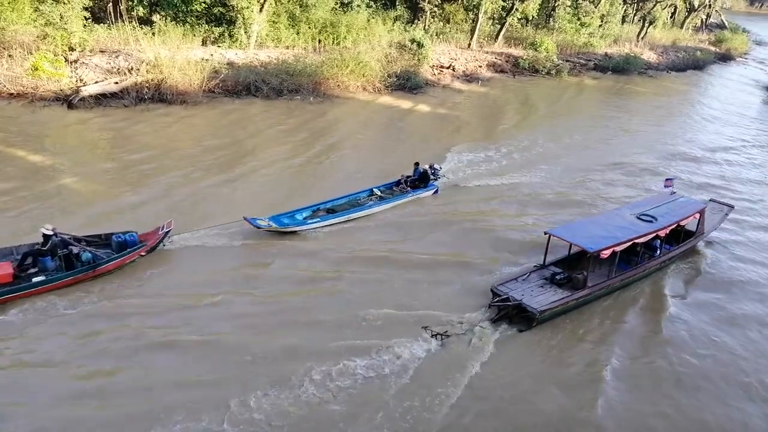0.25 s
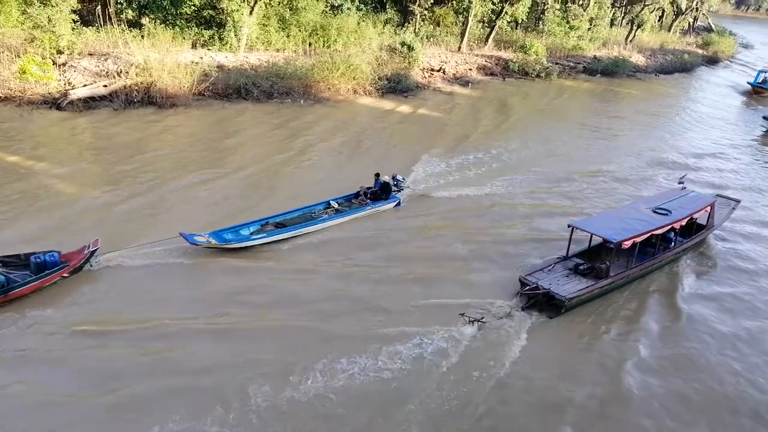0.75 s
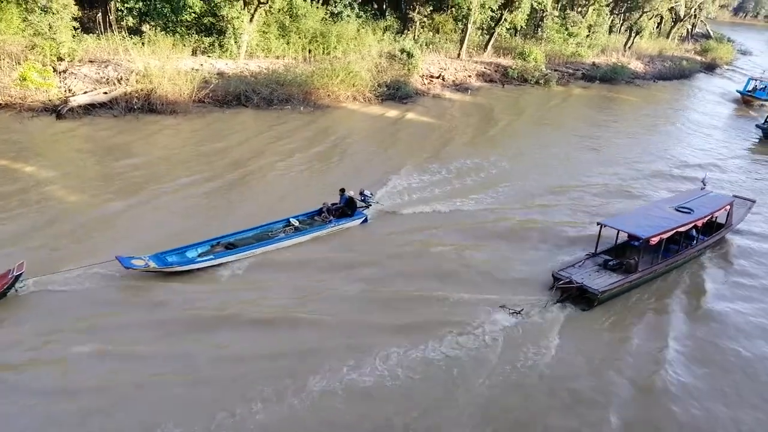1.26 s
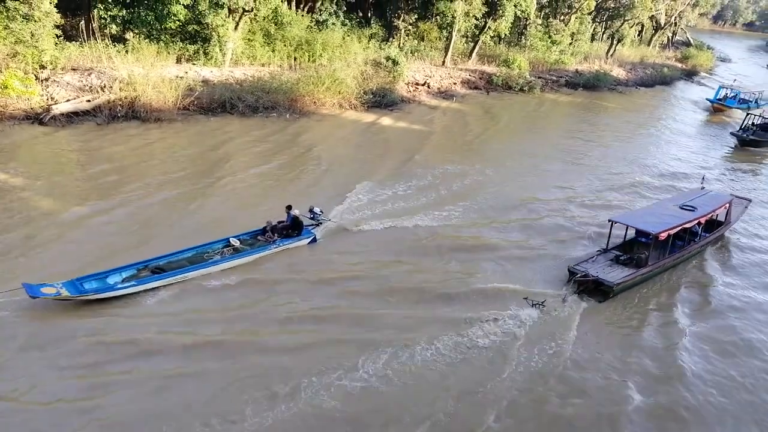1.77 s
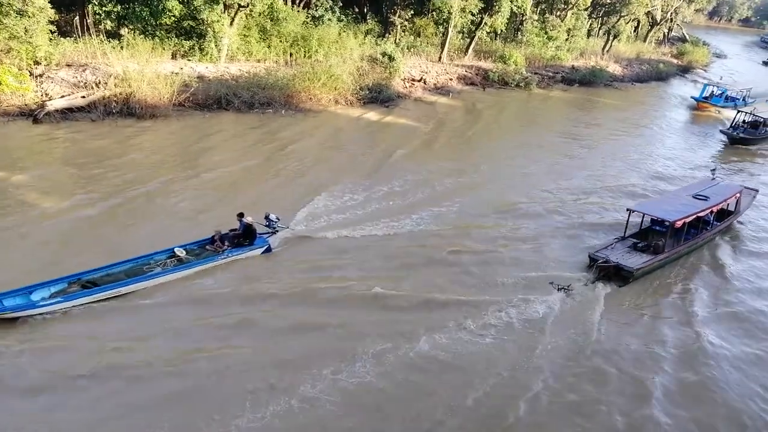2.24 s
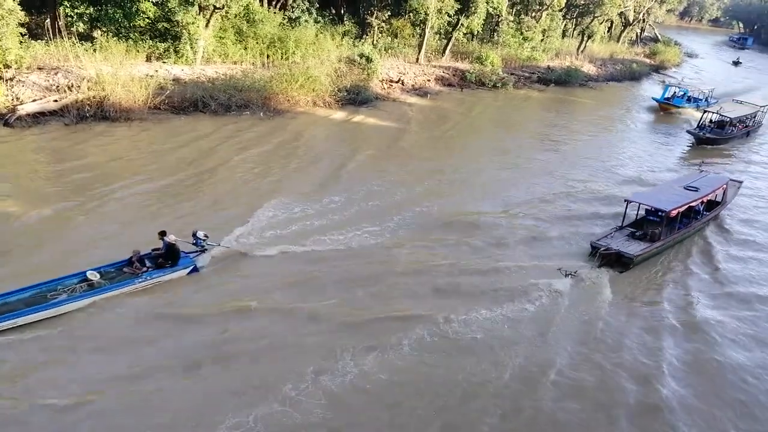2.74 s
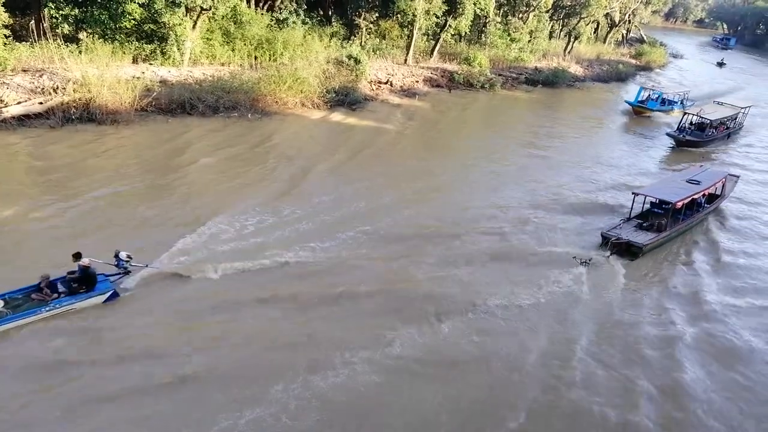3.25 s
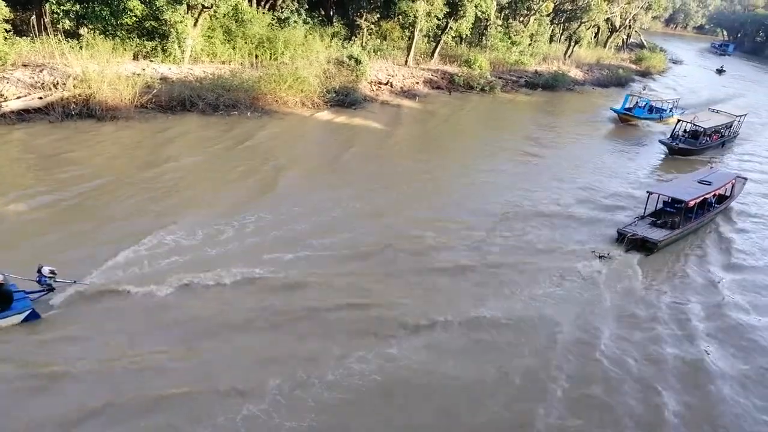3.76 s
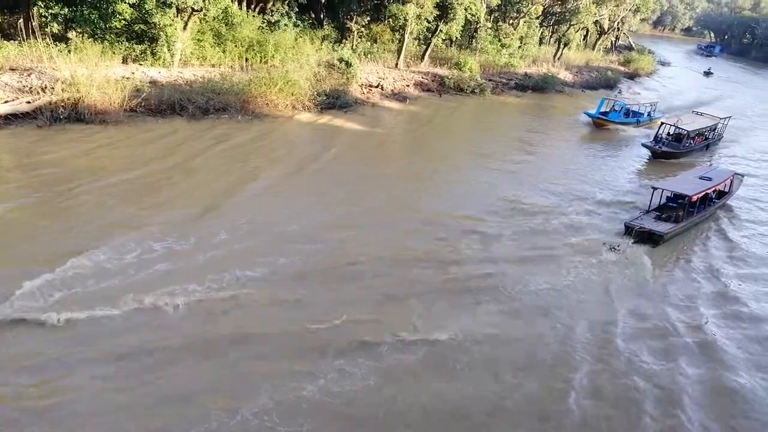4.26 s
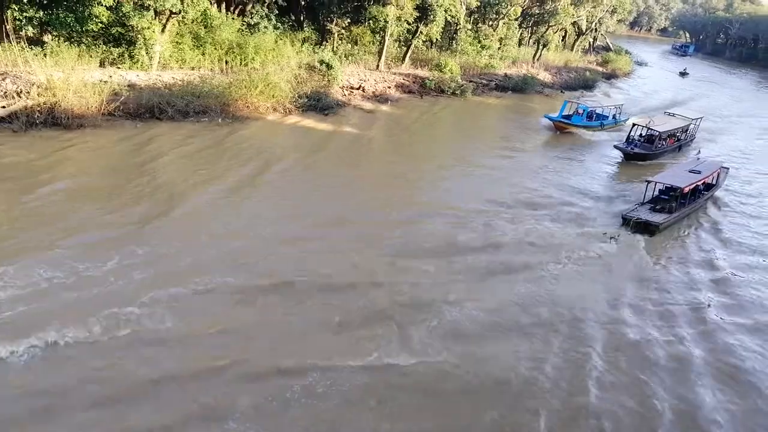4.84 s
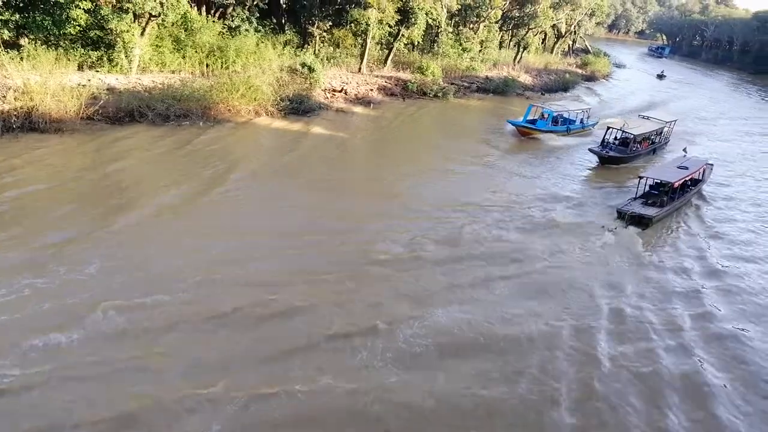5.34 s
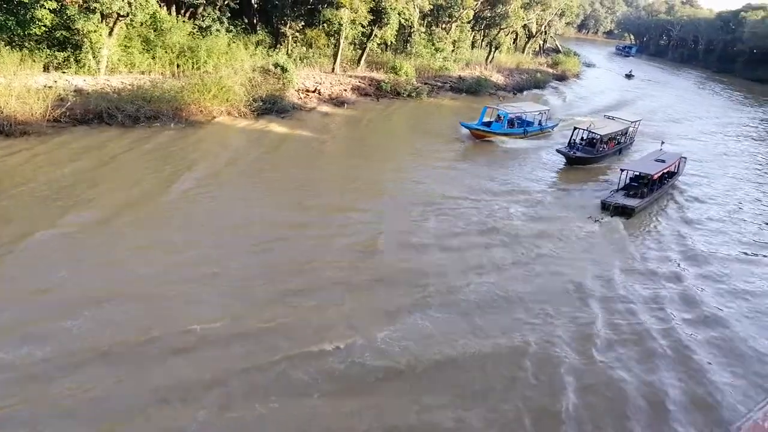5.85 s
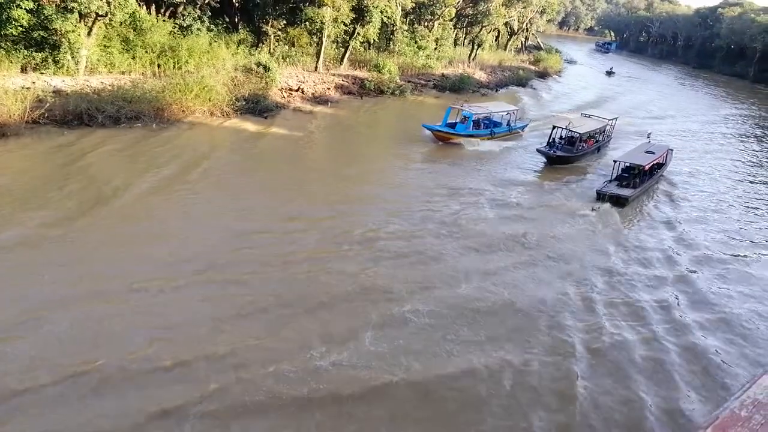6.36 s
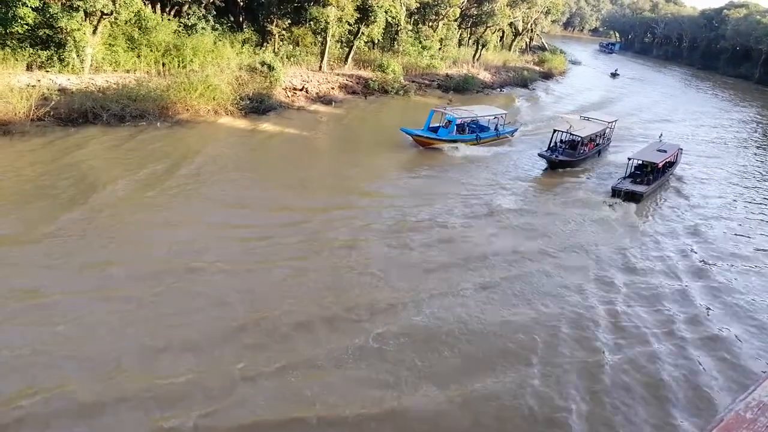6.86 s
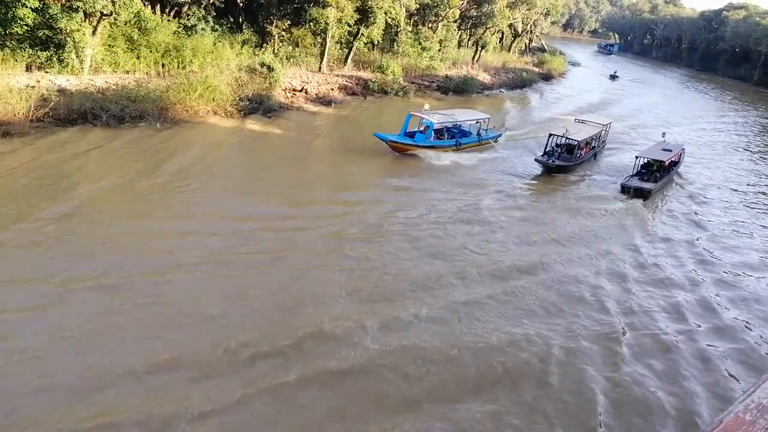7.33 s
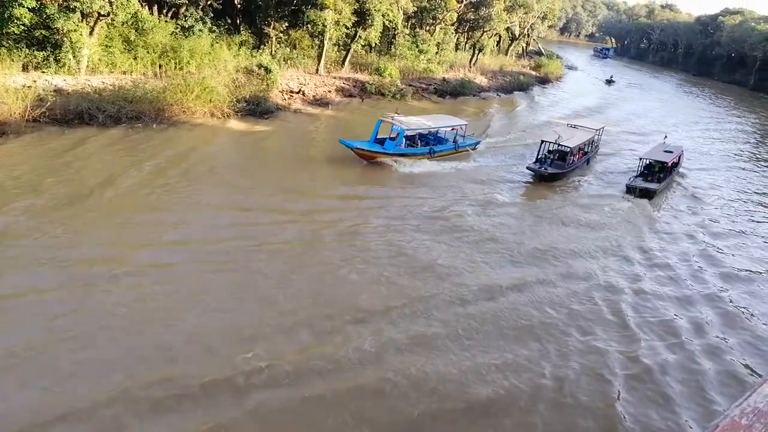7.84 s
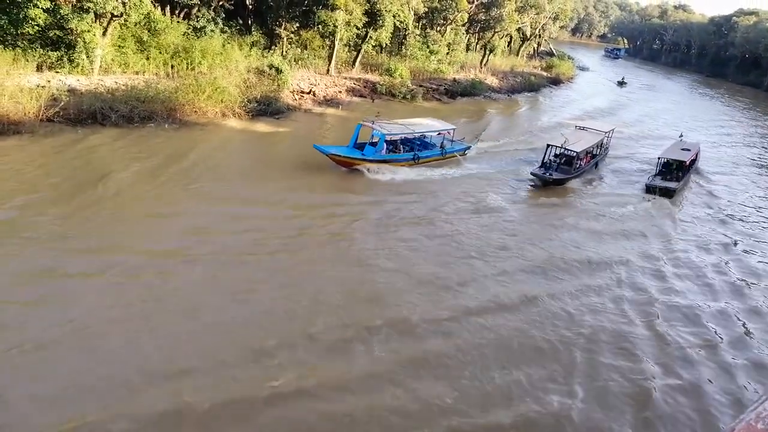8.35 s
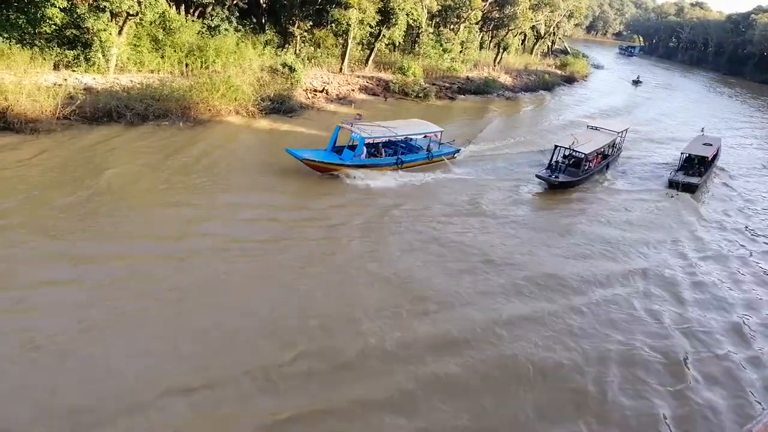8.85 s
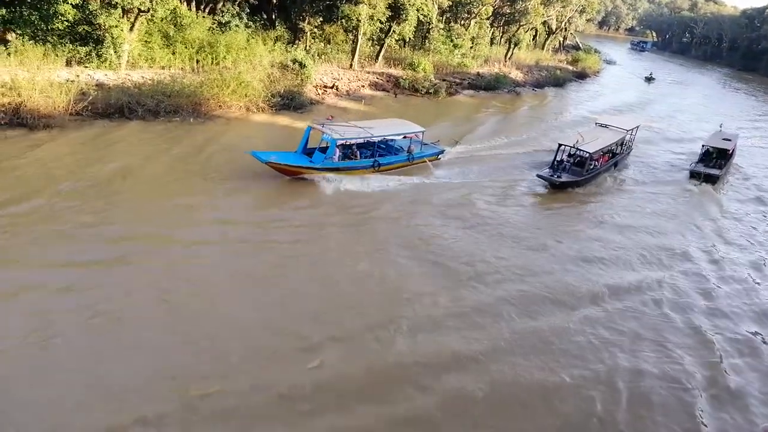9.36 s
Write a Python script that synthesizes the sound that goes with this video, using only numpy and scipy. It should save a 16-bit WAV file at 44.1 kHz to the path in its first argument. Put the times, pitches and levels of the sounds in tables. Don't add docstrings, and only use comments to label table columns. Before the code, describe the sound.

On an open river, a fast single-cylinder outboard putters sharply while a slower engine barks, hisses and thumps about ten times a second. A deep inboard drone and rushing wakes lie beneath. The fast engine fades out after six seconds; the slow one slackens, then pulls again near the end. Handheld stereo microphone above the water.

```python
import sys
import numpy as np
from scipy import signal
from scipy.fft import rfft, irfft
from scipy.io import wavfile
from scipy.ndimage import uniform_filter1d

SR = 44100
rng = np.random.default_rng(int(sys.argv[2]) if len(sys.argv) > 2 else 0)


def ratio(d):
    e = np.asarray(d, float) / 20
    return 10 ** e


def waveform_to_disk(signal):
    frames = np.transpose(np.atleast_2d(signal))
    scaled = np.clip(frames, -1, 1) * 32767
    samples = np.round(scaled).astype(np.int16)
    wavfile.write(sys.argv[1], SR, samples)


N = 423360
TIME = np.arange(N) / SR


def evened(x):
    return x / np.sqrt(np.mean(x ** 2) + 1e-20)


def curve(rows, column):
    return np.interp(TIME, [r[0] for r in rows], [r[column] for r in rows])


def colour(x, points):
    f, db = np.transpose(points)
    hz = np.fft.rfftfreq(N, 1 / SR)
    gain_db = np.interp(np.log(hz + 1), np.log(f), db)
    return irfft(rfft(x) * ratio(gain_db), N)


def noise(points):
    return evened(colour(rng.standard_normal(N), points + [(SR / 2, -90)]))


def wander(top_hz):
    t = TIME[::64]
    rates_hz = np.geomspace(top_hz / 12, top_hz, num=20)
    drift = sum(np.sin(2 * np.pi * (f * t + rng.random())) / np.sqrt(f) for f in rates_hz)
    return evened(drift).repeat(64)[:N]


def clicks(s, db):
    train = np.zeros(N)
    train[np.clip(np.round(s * SR).astype(int), 0, N - 1)] = ratio(db)
    return train


def gusts(train, t60_s, echo_db):
    rise_s, echo_s = 0.0013, 0.0095
    ragged_db, ragged_s = 1.9, 0.0012
    t = TIME[:SR // 5]
    shape = (1 - np.exp(-t / rise_s)) ** 2 * ratio(-60 * t / t60_s)
    shape = shape + ratio(echo_db) * np.interp(t - echo_s, t, shape, left=0)
    size = round(ragged_s * SR)
    tear = uniform_filter1d(uniform_filter1d(rng.standard_normal(N), size=size), size=size)
    return signal.oaconvolve(train, shape / shape.max())[:N] * ratio(ragged_db * evened(tear))


def thumps(train, modes, lead_s):
    t = TIME[:SR // 3]
    ring = sum(ratio(db - 60 * t / t60_s) * np.sin(2 * np.pi * hz * t) for hz, db, t60_s in modes)
    return signal.oaconvolve(train, ring)[round(lead_s * SR):][:N]


def resonate(x, hz, width_hz):
    turn = np.exp(2j * np.pi * np.cumsum(hz) / SR)
    r = np.exp(-np.pi * width_hz / SR)
    return 2 * (turn * signal.lfilter([(1 - r) ** 2], [1, -2 * r, r * r], x / turn)).real


def held(s, values):
    return values[np.clip(np.searchsorted(s, TIME) - 1, 0, None)]


def rung(envelope, drive, hz, width_hz):
    front = np.maximum(np.diff(envelope, n=2, prepend=envelope[[0, 0]]), 0)
    crack = signal.lfilter([1, -1], [1], front)
    ring = evened(resonate(envelope * drive, hz, width_hz))
    ring = ring + 0.8 * evened(resonate(crack, hz, 0.7 * width_hz))
    return evened(ring) * np.sqrt(np.mean(envelope ** 2))


START_TURNS = (-.785, -.518, -.70)


def crank(speed, engine):
    done = START_TURNS[engine] + np.cumsum(curve(speed, 1)) / SR
    return done, np.interp(np.arange(int(done[-1]) + 1), done, TIME)


def ports(x, loose_hz):
    lag_samples = 17
    hz = np.fft.rfftfreq(N, 1 / SR)
    share = 1 / (1 + (loose_hz / (hz + 1)) ** 3.1)
    right = irfft(np.sqrt(1 - share) * rfft(x[0]) + np.sqrt(share) * rfft(x[1]), N)
    return np.array([np.roll(x[0], lag_samples), right])


def banks(x):
    t = TIME[:SR // 2]
    tail = rng.standard_normal((2, len(t))) * ratio(-60 * t / 2.3) * (t > 0.015)
    return signal.fftconvolve(x, tail / np.linalg.norm(tail[0]), axes=1)[:, :N]


# (time [s], level [dB])
WAKE_SURGE = [(0.16, 3), (1.07, 1.8), (1.9, 0), (2.14, 2), (2.48, -5.5), (2.73, -1), (3.05, -3.5),
              (3.4, 1.5), (3.79, 2.5), (4.39, 3.5), (4.78, -1), (5.18, 5.5), (5.48, 1.5), (5.86, 2),
              (6.17, 0.5), (6.76, 2), (7.9, 2), (8.66, -5)]
# (frequency [Hz], level [dB])
RUMBLE_SPECTRUM = [(12, -45), (20, -18), (60, -2.5), (81, 0.5), (109, 0.5), (151, 0), (231, -9),
                   (267, -13.5), (303, -12), (464, -29.5), (600, -74), (780, -86), (1320, -120)]
ROAR_SPECTRUM = [(300, -2.5), (500, -6), (700, -12), (950, -0.5), (1400, -2), (2000, -3), (2500, 5),
                 (3100, -6.5), (4000, -7), (5000, -6.5), (6500, -18)]
FIZZ_SPECTRUM = [(3500, -24), (5000, -18.5), (7000, 0.5), (8500, -10), (10500, -20.5), (15000, -33.5)]


def wash():
    rumble_db, roar_db, fizz_db = -28, -27, -39.5
    lull_db, lull_at_s, lull_s = -5.5, 3.6, 0.78
    apart = np.array([noise(RUMBLE_SPECTRUM), noise(RUMBLE_SPECTRUM)])
    rumble = noise(RUMBLE_SPECTRUM) + ratio(-15.5) * apart
    swell_db = 0.64 * wander(25)
    surge_db = curve(WAKE_SURGE, 1)
    lull = lull_db * np.exp(-((TIME - lull_at_s) / lull_s) ** 2)
    roar_gain = ratio(roar_db + 0.15 * surge_db + swell_db)
    fizz_gain = ratio(fizz_db + lull + swell_db)
    air = [roar_gain * noise(ROAR_SPECTRUM) + fizz_gain * noise(FIZZ_SPECTRUM) for _ in "lr"]
    return ports(air, 670), rumble * ratio(rumble_db + surge_db)


# (time [s], 1st order [dB], 2nd order over 1st [dB])
INBOARD_LEVELS = [(0, -34, 0), (.3, -35, 9.5), (.8, -24.5, -15.5), (1.1, -34, -12), (1.5, -30.5, 2),
                  (2.4, -25.5, -26), (3.6, -30.5, -32), (4, -29, -17), (4.5, -23.5, -12), (5.1, -29.5, 2),
                  (5.5, -30, -6.5), (5.85, -19.5, -12), (6.25, -26, -8.5), (6.9, -28, 5), (7.25, -27, -6.5),
                  (7.5, -25.5, -2), (8.4, -23, 1), (9.2, -28.5, 2.5)]
# (multiple of firing [1], level [dB])
INBOARD_MINOR = [(.5, -45), (1.5, -37), (2.5, -41), (3.5, -48), (4, -47), (4.5, -51), (5, -52), (8.25, -57),
                 (12, -50), (13, -52), (14, -53), (16, -52)]
# (time [s], firing rate [1/s])
INBOARD_RATE = [(0.0, 74.564), (1.55, 74.623), (1.7, 74.882), (3.3, 75.164), (5.95, 75.276), (8.25, 73.879),
                (8.4, 73.197), (9.6, 71.43)]


def inboard():
    hull_hz, hull_width_hz, hull_db = 896, 190, -11
    nearing_db_per_s = 1.18
    turns = 2 * np.pi * crank(INBOARD_RATE, 2)[0]
    first, rasp = curve(INBOARD_LEVELS, 1), curve(INBOARD_LEVELS, 2)
    third = -44 + 0.39 * (first - first.mean()) + 0.033 * rasp + nearing_db_per_s * TIME
    main = sum(ratio(db + 1.8 * wander(6)) * np.cos(k * turns)
               for k, db in enumerate((first, first + rasp, third), 1))
    minor = sum(ratio(db + 1.17 * wander(4)) * np.cos(k * turns + (0.25 + 0.08 * k) * wander(8))
                for k, db in INBOARD_MINOR)
    hum = resonate(rng.standard_normal(N), np.full(N, hull_hz), hull_width_hz)
    hull = ratio(third + hull_db) * evened(hum)
    return hull - np.sqrt(2) * (main + minor * ratio(third + 34))


# (time [s], left puff [dB], right puff [dB], left crest [Hz], right crest [Hz])
FAST_PATH = [(0, -28.5, -26, 1180, 1150), (.5, -16.5, -21.5, 1360, 1170), (1, -16, -15.5, 1450, 2930),
             (1.7, -14.5, -15, 1810, 2640), (2.25, -14, -20, 2190, 2230), (3, -16, -25.5, 2300, 1690),
             (3.8, -13.5, -22.5, 2400, 1710), (4.6, -15.5, -20, 2460, 1620),
             (5.4, -13.5, -20.5, 2420, 1640), (6, -20.5, -18, 2210, 1600), (6.35, -33, -29.5, 2470, 1760),
             (6.9, -46, -37, 2400, 1750)]
# (time [s], firing rate [1/s])
FAST_RATE = [(0.0, 13.855), (1.3, 15.209), (1.5, 15.042), (1.85, 15.423), (3.75, 15.533), (3.9, 15.204),
             (4.4, 15.485), (6.35, 15.382), (6.9, 14.843)]
# (order [1], pipe turned away [dB], pipe turned our way [dB])
FAST_THUMP = [(1, -57, -58), (2, -33.5, -36), (3, -82, -44), (4, -55, -36), (5, -27.5, -40), (6, -27, -26),
              (7, -36.5, -27.5), (8, -67, -35), (9, -35.5, -58), (10, -35, -49), (11, -55, -37),
              (12, -41.5, -52), (14, -46, -47)]
# (frequency [Hz], level [dB])
PUFF_SPECTRUM = [(300, -9.5), (500, -14), (1000, -7), (1500, -5), (2000, -6.5), (2500, 0.5), (3100, -3),
                 (4000, -4.5), (5500, -17), (7000, -11.5), (8500, -17), (10500, -27), (15800, -41)]


def fast_engine():
    done, s = crank(FAST_RATE, 1)
    s = s[s < FAST_PATH[-1][0]]
    luck = rng.standard_normal((len(s), 3))
    left_hz, right_hz = curve(FAST_PATH, 3), curve(FAST_PATH, 4)
    turn_from_s, turn_s = 3.45, 2.1
    facing = np.clip((TIME - turn_from_s) / turn_s, 0, 1)

    puffs = gusts(clicks(s, 1.83 * luck[:, 0]), 0.034, -20)
    puffs = puffs + 0.14 + 0.22 * np.exp(-TIME / 0.49)
    late_s = TIME - 0.91 / left_hz
    air = [puffs * noise(PUFF_SPECTRUM) for _ in "lr"]
    air = ports([x + 0.34 * np.interp(late_s, TIME, x) for x in air], 2100)

    white = rng.standard_normal(N)
    drift = 1 + 0.053 * held(s, luck[:, 2])
    crests = [rung(puffs, white, hz * drift, 380) for hz in (left_hz, right_hz)]
    crests[0] = crests[0] + 0.2 * rung(puffs, white, 2 * left_hz * drift, 610) * (1 - facing)
    port_db = np.array([curve(FAST_PATH, 1) - 2.5, curve(FAST_PATH, 2) - 2.6])
    air = (air + ratio(1.0) * np.array(crests)) * ratio(port_db)

    ring_peak_s, ring_s = 4.2, 1.7
    ring_db = -27 + 9 * np.exp(-((TIME - ring_peak_s) / ring_s) ** 2)
    strikes = clicks(s + 0.0004 * luck[:, 2], 1.2 * luck[:, 1])
    ring = thumps(strikes, [(765, 0, 0.075), (690, -5, 0.06)], 0.014) * ratio(ring_db)
    knock = thumps(clicks(s, luck[:, 0]), [(489, -30.5, 0.043)], 0) * (1 - facing)

    turns = 2 * np.pi * (done - 0.018)
    close_db, close_s, gone_s, gone_db_per_s = 4.5, 0.24, 6.35, 51
    thump_db = -4 + close_db * np.exp(-TIME / close_s) - gone_db_per_s * np.maximum(TIME - gone_s, 0)
    thump = sum(ratio(away + facing * (near - away) + 1.3 * wander(4)) * np.cos(k * turns)
                for k, away, near in FAST_THUMP)
    return air + knock + ring * np.array([[-0.5], [1]]), -np.sqrt(2) * thump * ratio(thump_db)


# (time [s], firing rate [1/s])
SLOW_RATE = [(0.0, 10.096), (5.55, 9.89), (6.1, 9.482), (6.3, 8.596), (6.6, 8.692), (6.75, 8.421),
             (8.05, 7.811), (8.35, 7.824), (8.6, 8.369), (8.75, 8.795), (9.2, 9.411), (9.6, 9.243)]
# (time [s], hiss [dB], bark over hiss [dB])
SLOW_THROTTLE = [(0, -36, 11.5), (1.3, -33.5, 11.5), (1.6, -36, 1.5), (2.2, -35, 13.5), (4.1, -38, 12.5),
                 (4.4, -27.5, 5.5), (4.98, -37.5, 13.5), (5.07, -23.5, -1), (5.7, -27, -1), (5.79, -34, -1),
                 (6.3, -34, 1), (8.03, -43, 6), (8.14, -32.5, -5), (8.42, -31.5, 11.5), (8.55, -21, -0.5),
                 (8.88, -19.5, -1), (8.98, -34, 6), (9.6, -29.5, 7.5)]
# (time [s], extra hiss [dB], extra bark [dB], bright spot [Hz])
HARD_FIRINGS = [(0.077, 5, 6, 2530), (.376, 4, 3.5, 2820), (.475, 8, 6.5, 1940), (.574, 2.5, 1.5, 3320),
                (0.87, 6, 2.5, 2760), (0.975, 7.5, 3, 2720), (1.17, -4.5, 2, 3010), (1.268, 5, 5.5, 3000),
                (1.368, 9, 5.5, 2380), (1.467, 4.5, 4.5, 2720), (1.566, 9.5, 8.5, 2590),
                (1.767, 4, 8.5, 2750), (2.365, 3.5, 2, 2700), (2.465, 9, 4.5, 2290), (2.865, 8, 3.5, 3250),
                (3.167, 4.5, 3, 2490), (3.266, 9.5, 5.5, 3080), (3.569, 7, 2.5, 2420),
                (3.667, 6.5, .6, 2420), (3.869, 8, 3.5, 2570), (3.969, 5.5, 4.5, 2270),
                (4.27, 5.5, 0, 2450), (4.572, 5.5, 4, 2420), (4.773, 7.5, 3.5, 2580), (6.669, 6.5, 8, 2560),
                (7.028, 6, 7, 2450), (7.148, 4.5, 1, 2600), (7.639, 8.5, 4, 2560), (7.892, 8.5, -7, 2300),
                (9.093, 9.5, 7, 2340)]
# (time [s], extra hiss [dB], extra bark [dB], bright spot [Hz], high spot [Hz])
PULL_FIRINGS = [
    (8.403, 0.5, -2, 2470, 7000),
    (8.526, -1, 0, 3090, 5430),
    (8.646, 0.5, 1, 2350, 5800),
    (8.762, 0, -2, 2300, 7440),
    (8.875, -0.5, -2.5, 3210, 4840),
    (8.984, 6, 3.5, 2580, 7500),
    (9.201, -2, 1, 2360, 6900),
    (9.415, 3, -4, 2700, 5670),
]
# (time [s], level [dB])
WEAK_FIRINGS = [(1.072, -21), (1.667, 1), (3.367, 0), (3.469, -2.5), (4.472, -14), (4.876, -1), (5.28, -3),
                (5.583, -2.5), (6.1, -5), (6.322, -7), (7.27, -8)]


def slow_firings():
    luck_db, usual_spot_hz, spot_spread_hz = 4.2, 2478, 240
    s = crank(SLOW_RATE, 0)[1]
    luck = rng.standard_normal((len(s), 3))
    hiss_db, bark_db = luck_db * luck[:, 0], luck_db * luck[:, 1]
    spot_hz = usual_spot_hz + spot_spread_hz * luck[:, 2]
    for when, hiss, bark, hz in HARD_FIRINGS:
        k = np.argmin(abs(s - when))
        s[k], hiss_db[k], bark_db[k], spot_hz[k] = when, hiss, bark, hz
    high_hz = rng.uniform(4140, 7630, len(s))
    for when, hiss, bark, hz, high in PULL_FIRINGS:
        k = np.argmin(abs(s - when))
        s[k], hiss_db[k], bark_db[k], spot_hz[k], high_hz[k] = when, hiss, bark, hz, high
    for when, db in WEAK_FIRINGS:
        k = np.argmin(abs(s - when))
        hiss_db[k] = bark_db[k] = db
    when, load_db, over_db = np.transpose(SLOW_THROTTLE)
    over_hiss_db = bark_db - hiss_db + np.interp(s, when, over_db)
    return s, hiss_db + np.interp(s, when, load_db), over_hiss_db, spot_hz, high_hz


# (frequency [Hz], level [dB])
BARK_SPECTRUM = [(500, -38), (1000, -34), (1500, 1), (2000, 1), (2500, 5), (3100, 3), (4000, 3), (5200, 2),
                 (6500, -35)]
HISS_SPECTRUM = [(3500, -15), (5000, -8), (7000, -1.5), (8500, -1.5), (10500, -14), (13000, -21),
                 (15800, -41)]
# (frequency [Hz], level [dB], t60 [s])
SLOW_MODES = [(70, 2.5, 0.058), (117, -19, 0.12), (152, -4, 0.05)]


def slow_engine():
    s, hiss_db, bark_db, spot_hz, high_hz = slow_firings()
    bark = gusts(clicks(s, hiss_db + bark_db + 3), 0.036, -10.5)
    hiss = gusts(clicks(s, hiss_db + 6), 0.031, -17.5)
    white = rng.standard_normal((4, N))
    barks = [bark * noise(BARK_SPECTRUM) + rung(bark, w, held(s, spot_hz), 400) for w in white[:2]]
    hisses = [hiss * noise(HISS_SPECTRUM) + 0.55 * rung(hiss, w, held(s, high_hz), 820) for w in white[2:]]
    thump = thumps(clicks(s, 0.58 * (hiss_db + bark_db)), SLOW_MODES, 0)
    return ports(ratio(0.5) * np.add(barks, hisses), 1300), -ratio(-10.5) * thump


def scene():
    slow, slow_bass = slow_engine()
    fast, fast_bass = fast_engine()
    water, rumble = wash()
    air = slow + fast + ratio(-12.5) * banks(slow + fast) + water
    lowpass = signal.butter(2, 5000, fs=SR, output="sos")
    feed = signal.sosfiltfilt(lowpass, air[::-1])
    air = air - 0.2 * np.roll(feed, 22, axis=1)
    return air * ratio(-0.65) + slow_bass + fast_bass + inboard() + rumble


def low_pass(x):
    return signal.sosfilt(signal.butter(12, 15800, fs=SR, output="sos"), x)


# (frequency [Hz], gain [dB])
RIGHT_RESPONSE = [(300, 0), (1100, -0.5), (1350, -1), (1700, 3), (2100, 1.5), (2600, 0), (3200, -1.5),
                  (4000, -12), (5700, -5.5), (7000, -18.5), (8500, -41), (10500, -0.5), (15000, -1)]


def record(dry):
    heard = np.array([dry[0], colour(dry[1], RIGHT_RESPONSE)])
    highpass = signal.butter(2, 18, "highpass", fs=SR, output="sos")
    heard = np.clip(signal.sosfiltfilt(highpass, heard), -0.93, 0.93)
    lowpass = signal.firwin(255, 15250, fs=SR)
    mix = signal.oaconvolve(heard, lowpass[None], "same")
    return low_pass(mix)


dry = scene()
out = record(dry)
waveform_to_disk(out)
```